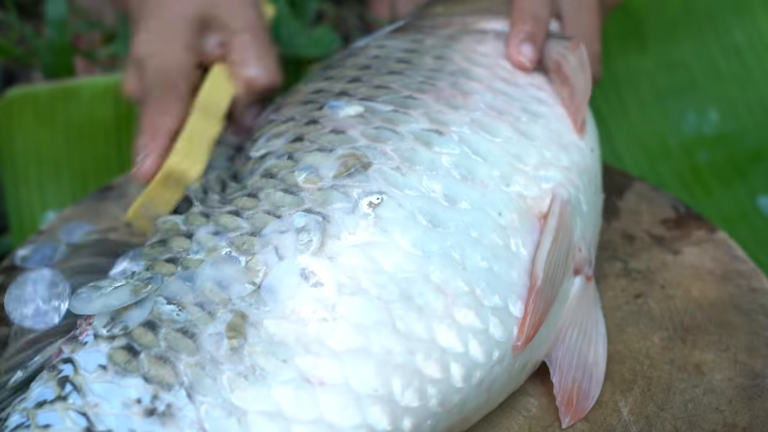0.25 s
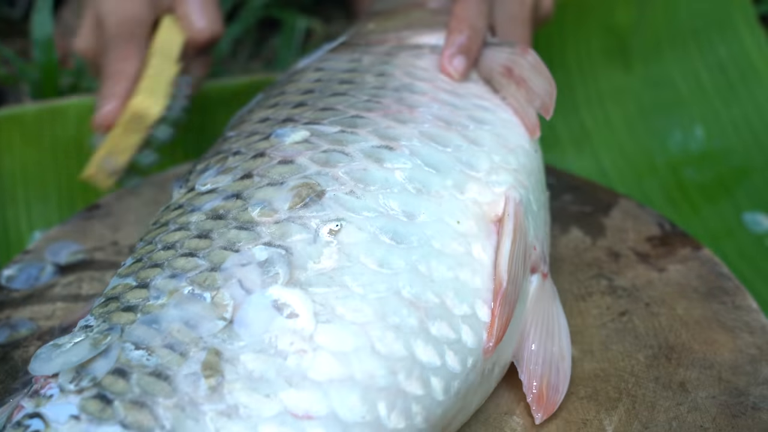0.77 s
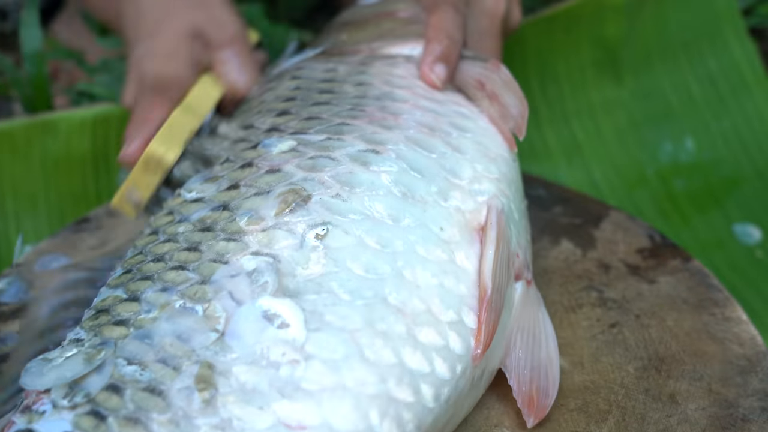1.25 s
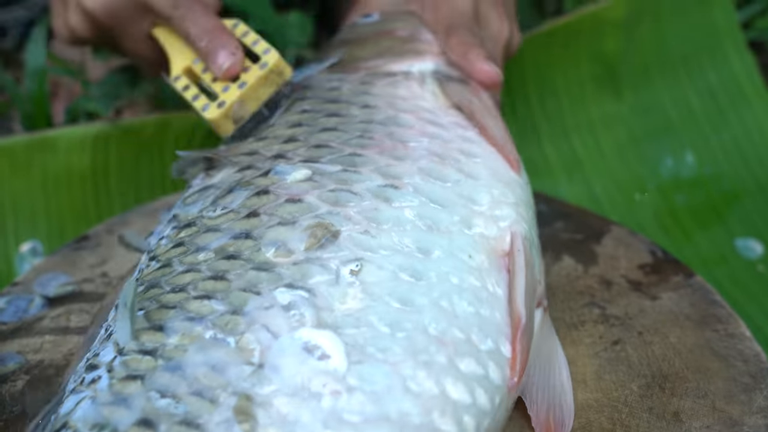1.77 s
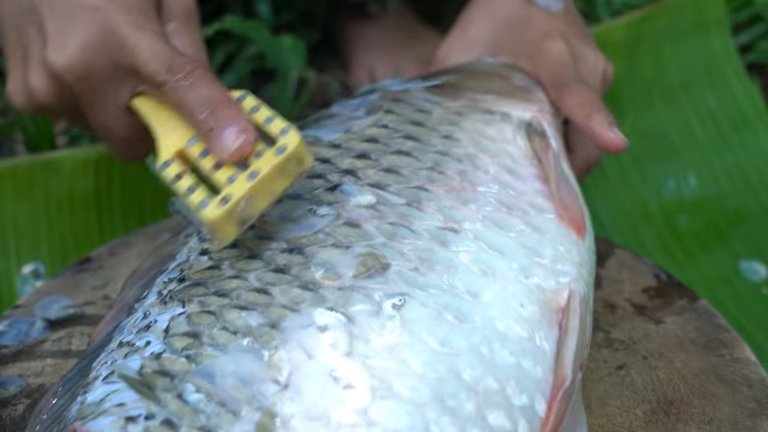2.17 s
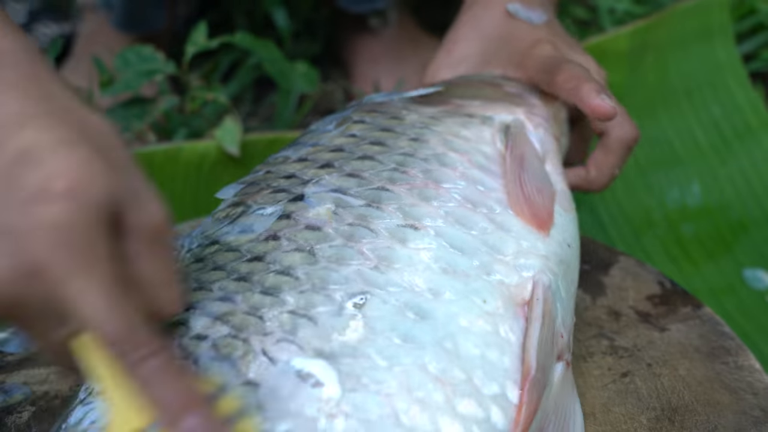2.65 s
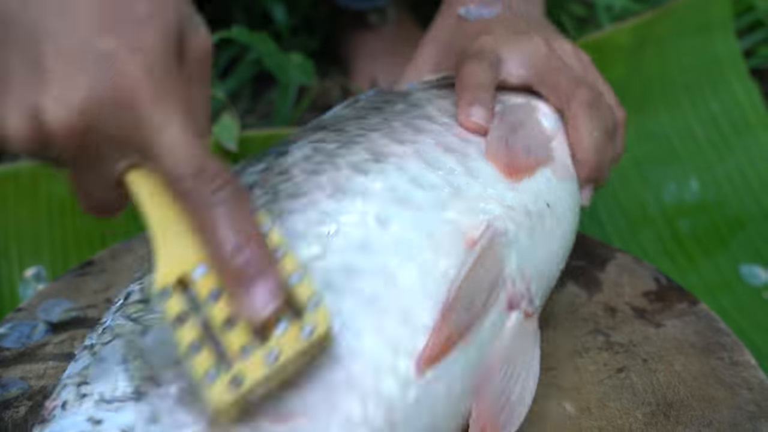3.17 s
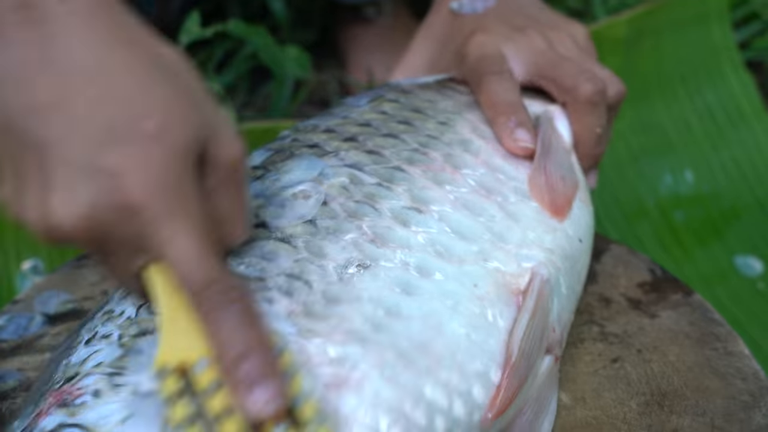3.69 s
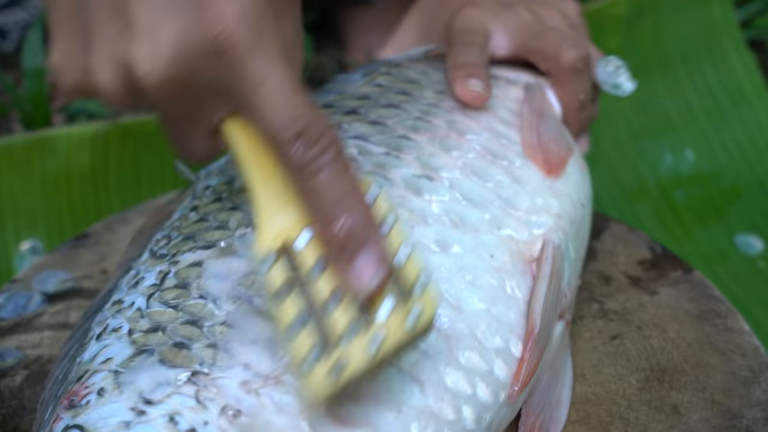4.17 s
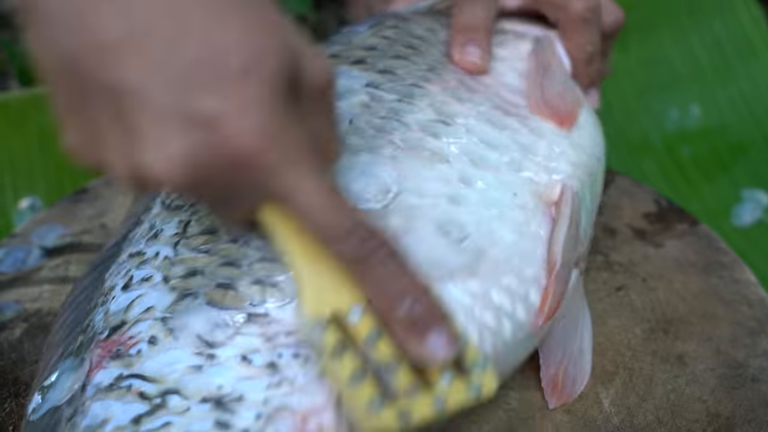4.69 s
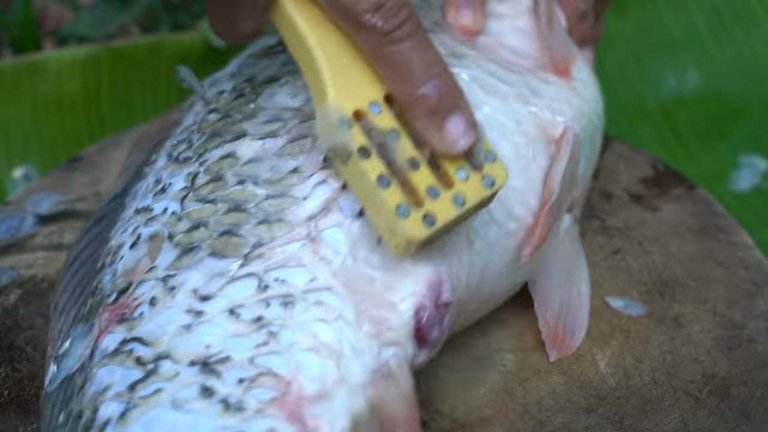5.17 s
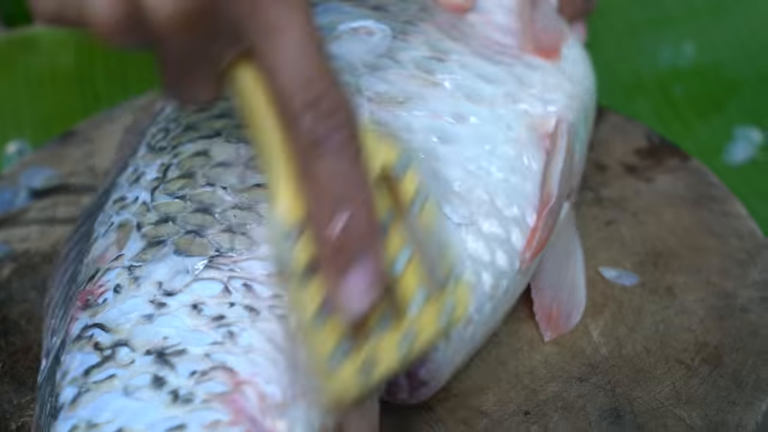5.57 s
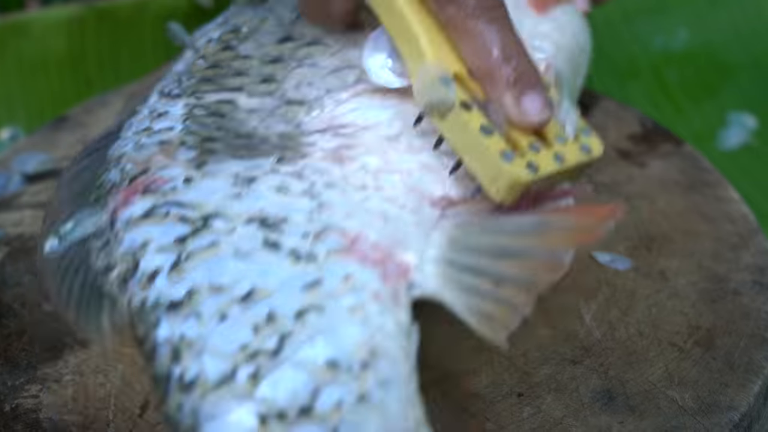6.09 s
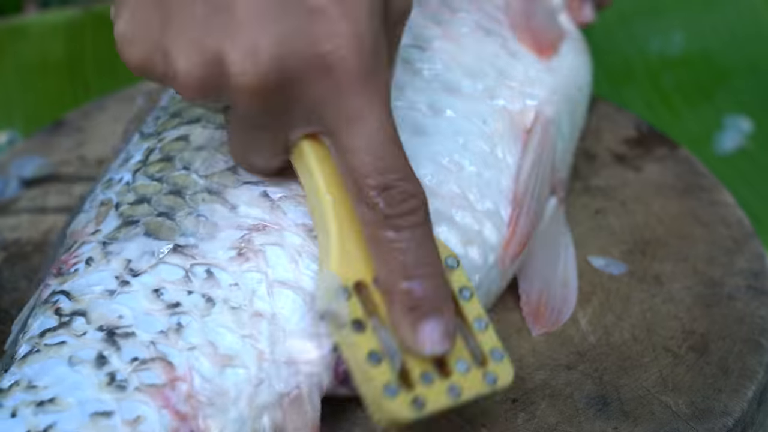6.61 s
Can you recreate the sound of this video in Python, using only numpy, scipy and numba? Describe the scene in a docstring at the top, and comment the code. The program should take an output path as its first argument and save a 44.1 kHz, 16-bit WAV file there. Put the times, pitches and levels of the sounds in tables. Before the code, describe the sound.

A toothed plastic scaler rasps along a large fish on a wooden block, very close to the microphone. From the start it keeps an even rhythm of about three strokes a second, each a short, wet, crackling burst with a slight hollow ring from the tool. Between strokes the teeth brush lightly back, and single scales snap off with sharp clicks throughout. A few dull taps fall between about 1 and 2.6 seconds. From roughly 2 to 5 seconds the flesh gives soft, low thumps under the pushes. The strokes gradually ease and are weakest from about 5.7 to 6.5 seconds. At 6.4 seconds the tool clatters briefly against the block, then a firmer stroke and more snaps follow around 6.8 seconds. Underneath are a faint sticky crackle of wet skin, a soft outdoor hiss and a low wind rumble, with almost no echo.

```python
"""A wet, crackling rasp close to the microphone: a toothed plastic scaler works along a large fish on a
wooden block outdoors, three strokes a second. The teeth flick up scales in dense bursts; the flesh
thuds under them and the tool's hollow head rings. Between strokes the tool brushes lightly back.
Single scales snap off, and a few dull taps sound over quiet open air."""
import sys
import numpy as np
from scipy import signal
from scipy.fft import rfft, irfft
from scipy.io import wavfile
from scipy.ndimage import uniform_filter1d
from numba import njit

SR = 44100
rng = np.random.default_rng(int(sys.argv[2]) if len(sys.argv) > 2 else 0)


def generate_wav(sig):
    """Save sig (samples, or channels by samples) to the path in sys.argv[1] as 16-bit PCM at SR."""
    pcm = np.round(np.clip(np.atleast_2d(sig).T, -1, 1) * 32767).astype(np.int16)
    wavfile.write(sys.argv[1], SR, pcm)


N = 301644
T = np.arange(N) / SR


def undb(db):
    """Decibels to gain."""
    return 10 ** (np.asarray(db) / 20)


def unit(x):
    """Scale to rms 1."""
    return x / np.sqrt(np.mean(x ** 2))


def fade(t, t60):
    """Exponential decay, 60 dB down after t60 seconds."""
    return np.exp(-np.log(1000) * t / t60)


def add(out, start_s, sound):
    """Mix a short sound in at start_s."""
    i = max(int(start_s * SR), 0)
    out[i:i + len(sound)] += sound[:max(N - i, 0)]


def colour(x, points):
    """Causal filter with the given (Hz, dB) response; the result has rms 1."""
    hz, db = np.transpose(points)
    bin_hz = np.arange(N + 1) * SR / (2 * N)
    gain = undb(np.interp(np.log(bin_hz + 1), np.log(hz), db))
    cepstrum = irfft(np.log(gain))
    cepstrum[1:N] *= 2  # fold to minimum phase
    cepstrum[N + 1:] = 0
    return unit(irfft(rfft(x, 2 * N) * np.exp(rfft(cepstrum)))[:N])


@njit
def ring_grains(start, pole, size):
    """Sum of grains, each a damped sine whose pole sets its pitch and decay."""
    out = np.zeros(N)
    for k in range(len(start)):
        z = size[k] + 0j
        for i in range(start[k], min(N, start[k] + int(-6 / np.log(abs(pole[k]))))):
            z *= pole[k]
            out[i] += z.imag
    return out


def flicks(rate, scatter_db, t60):
    """Scales catch and release about rate times a second: the kicks, and the flurry after each."""
    gap, strength = rng.standard_normal((4000, 2)).T
    at = (np.cumsum(np.exp(.5 * gap)) * SR / rate).astype(int)
    kicks = np.zeros(N)
    kicks[at[at < N]] = undb(scatter_db * np.clip(strength[at < N], -2, 1))
    return kicks, unit(signal.lfilter([1], [1, -fade(1 / SR, t60)], kicks))


def crackle(drive, low_hz, high_hz, cycles, scatter_db, count):
    """Tiny rings of scale edges and slime, each with its own pitch and length, as strong as the drive."""
    place, pitch, length, sign = rng.random((count, 4)).T
    start = (place * N).astype(int)
    hz = low_hz * (high_hz / low_hz) ** pitch
    t60 = cycles * 4 ** (length - .5) / hz
    scatter = undb(scatter_db * np.clip(rng.standard_normal(count), -2, 2))
    size = drive[start] * np.sqrt(hz / t60) * np.sign(sign - .5) * scatter
    pole = fade(1 / SR, t60) * np.exp(2j * np.pi * hz / SR)
    return unit(ring_grains(start, pole, size))


def twang(kicks, low_hz, high_hz, t60):
    """Each released scale rings for a moment at a pitch of its own."""
    start = np.flatnonzero(kicks)
    pitch, length = rng.random((4000, 2))[:len(start)].T
    hz = low_hz * (high_hz / low_hz) ** pitch
    pole = fade(1 / SR, t60 * 3 ** (length - .5)) * np.exp(2j * np.pi * hz / SR)
    return unit(ring_grains(start, pole, kicks[start]))


def steady(x):
    """The hand keeps its pressure: single flicks differ, but their power over 25 ms is even."""
    return x / np.sqrt(uniform_filter1d(x ** 2, size=1100) + 1e-9)


def around(start, length):
    """The samples of one contact, with room for landing and lifting."""
    return slice(max(int((start - .05) * SR), 0), int((start + length + .08) * SR))


def contact(age, length, crest, first_db, last_db, arch):
    """Gain of one contact: the tool lands fast, the pressure arches over its crest, the tool lifts."""
    landing_db_per_s, lift_db_per_s = 3992, 1395
    crest = np.clip(crest, .05, .95)
    past = np.clip(age / length, 0, 1) - crest
    rising_db = first_db * abs(past / crest) ** arch
    falling_db = last_db * abs(past / (1 - crest)) ** arch
    away_db = landing_db_per_s * np.maximum(-age, 0) + lift_db_per_s * np.maximum(age - length, 0)
    return undb(np.where(past < 0, rising_db, falling_db) - away_db)


# The air all around, and the low wind. Each row: frequency in Hz, relative level in dB.
AIR_SPECTRUM = [(100, -1), (170, -3.5), (280, -11), (600, -12.5), (1500, -15), (3000, -24), (8000, -16.5),
                (11000, -28.5), (16000, -40)]
WIND_SPECTRUM = [(10, 14), (25, 8.5), (40, -16.5), (60, -18.5), (120, -14.5), (300, -35)]

def open_air():
    """Far behind the work, a soft outdoor hiss lies over an unsteady rumble of wind."""
    gust = unit(signal.resample(rng.standard_normal(40), N))
    hiss = undb(-59) * colour(rng.standard_normal(N), AIR_SPECTRUM)
    rumble = undb(-45.5 + 2 * gust) * colour(rng.standard_normal(N), WIND_SPECTRUM)
    return hiss + rumble


def surroundings(x):
    """Ground and leaves around the block scatter a faint short tail back to the microphone."""
    t = T[:SR // 2]
    dull_noise = signal.lfilter(*signal.butter(1, 4500, fs=SR), rng.standard_normal(len(t)))
    tail = dull_noise * fade(t, 0.52) * (t > .004)
    return undb(-35) * signal.fftconvolve(x, tail / np.linalg.norm(tail))[:N]


# Wet skin on wood. Each row: frequency in Hz, relative level in dB.
WET_SKIN_SPECTRUM = [(150, -6.5), (400, -4.5), (800, -4.5), (1300, -2), (2000, -7.5), (2800, -12),
                     (7000, -14), (12000, -23.5), (16000, -40)]
# The fish shifts under the holding hand. Each row: start in seconds, length in seconds, level in dB.
FISH_SHIFTS = [(0.44, .2, -48.5), (0.87, 0.17, -59), (1.152, 0.13, -41.5), (1.96, 0.052, -49.5),
               (2.169, 0.13, -53.5), (2.816, 0.47, -59), (4.934, 0.24, -53.5), (6.22, 0.11, -65)]

def slither():
    """Down on the wet block the fish creeps: a faint, sticky crackle that swells whenever it shifts."""
    creep_db, settled_db, settle_s = -49, -63, 2.53
    _, flurry = flicks(rate=120, scatter_db=4, t60=.04)
    film = crackle(flurry + 0.65, 151, 14200, cycles=18, scatter_db=1.5, count=40000)
    motion = undb(settled_db + (creep_db - settled_db) * np.exp(-T / settle_s))
    for start, length, db in FISH_SHIFTS:
        add(motion, start, undb(db) * np.hanning(int(length * SR)))
    return colour(film, WET_SKIN_SPECTRUM) * motion


# The fish gives way under a hard push. Each row: start in seconds, relative level in dB.
BODY_THUMPS = [(2.14, -38), (2.478, -35), (2.781, -33), (3.121, -43), (3.481, -46), (3.826, -52),
               (4.097, -36), (4.438, -41), (4.8, -46), (5.134, -40), (6.383, -35)]

def thumps():
    """The soft body answers a push with a few low, quickly damped swings."""
    out, t = np.zeros(N), T[:SR // 6]
    for start, db in BODY_THUMPS:
        body = sum(np.sin(2 * np.pi * hz * rng.normal(1, 0.093) * t) for hz in (75, 120, 175))
        add(out, start, undb(db) * 0.85 * body * fade(t, 0.12) * (1 - fade(t, 0.013)))
    return out


# Struck flesh. Each row: frequency in Hz, relative level in dB.
FLESH_SPECTRUM = [(30, -2), (70, -6.5), (130, -7.5), (300, 1.5), (600, 4), (1000, 7.5), (1600, 2),
                  (4000, -25)]
# Dull taps, and the tool clattering on the block.
# Each row: start in seconds, relative level in dB, pitch in Hz.
DULL_TAPS = [(0.922, -20, 1390), (1.149, -20, 692), (1.213, -23.5, 1510), (1.266, -12.5, 680),
             (1.543, -22.5, 1330), (1.852, -25, 950), (2.598, -17, 1040), (5.045, -24.5, 1110),
             (5.235, -26, 1250), (6.336, -27, 920), (6.354, -30, 2470), (6.397, -1, 1260),
             (6.403, -3.5, 1200), (6.408, -5.5, 1450), (6.413, -20, 663), (6.42, -8, 571)]

def taps():
    """Blunt contacts at the block: a heavily damped knock, a wet splat and a short thud of flesh."""
    out, t = np.zeros(N), T[:SR // 10]
    wet = colour(rng.standard_normal(N), WET_SKIN_SPECTRUM)
    flesh = colour(rng.standard_normal(N), FLESH_SPECTRUM)
    for k, (start, db, hz) in enumerate(DULL_TAPS):
        part = slice(k * len(t), (k + 1) * len(t))
        knock = 0.43 * np.sin(2 * np.pi * hz * t) * fade(t, 0.015)
        splat = 0.26 * wet[part] * fade(t, 0.02)
        thud = 0.064 * flesh[part] * fade(t, 0.052)
        add(out, start, undb(db) * (knock + splat + thud))
    return out


# Brushed scales and fizzing slime, heard close. Each row: frequency in Hz, relative level in dB.
RUSTLE_SPECTRUM = [(100, -19), (500, -17.5), (1000, -0.5), (1600, 2), (3000, 8), (4500, 9), (6800, -7.5),
                   (10000, -33), (16000, -44)]
FIZZ_SPECTRUM = [(4000, -15), (7000, -6), (8200, -0.5), (9100, 0.5), (10200, -10), (11300, -14),
                 (13500, -8), (16000, -25.5)]
# Light returns of the tool. Each row: start in seconds, length in seconds, level in dB,
# hardest point as a share of the length, relative fizz in dB.
RETURN_BRUSHES = [(0.143, 0.032, -33, 0.24, -8.5), (0.788, 0.13, -49.5, 0.22, -1),
                  (1.129, 0.032, -29.5, 0.84, -10), (1.457, 0.037, -30, .65, -13.5),
                  (1.59, 0.028, -27, 0.13, -4), (1.62, 0.031, -30.5, 0.38, -7),
                  (2.592, 0.089, -26.5, 0.73, -3.5), (2.928, 0.078, -30.5, 0.69, -2.5),
                  (3.010, 0.1, -58, 0.36, 2), (3.21, 0.083, -39.5, 0.55, -10.5),
                  (3.28, 0.026, -26, 0.26, -1.5), (3.599, 0.035, -34, .6, -1), (3.64, 0.03, -38, 0.6, -1),
                  (3.886, 0.027, -24.5, 0.37, -7), (3.923, 0.081, -50.5, 0.12, 1),
                  (4.245, .055, -41.5, 0.69, -3.5), (4.596, 0.03, -28.5, 0.29, -2),
                  (4.849, 0.069, -32.5, 0.4, -11), (4.906, 0.07, -34, .75, -22),
                  (5.203, 0.032, -35, 0.61, -11), (5.275, 0.077, -43, 0.5, -7), (5.360, .017, -49, .5, -7),
                  (5.621, 0.069, -38, 0.16, -8), (5.949, 0.042, -43, 0.8, -8),
                  (6.158, 0.062, -41, 0.29, -13), (6.580, 0.035, -35, 0.42, -5),
                  (6.613, .014, -37, 0.59, -1), (6.830, 0.017, -25.5, 0.43, -2)]

def brushes():
    """Sliding back with the lie of the scales, the teeth make a fine wet rustle with sticky ticks."""
    kicks, flurry = flicks(rate=220, scatter_db=-3.5, t60=0.031)
    drive = flurry + 2
    scales = crackle(drive, 155.6, 13950, cycles=16, scatter_db=9, count=40000)
    edges = twang(kicks, 1500, 9000, t60=0.0085)
    rustle = steady(colour(scales + 0.23 * edges + 0.47 * unit(kicks), RUSTLE_SPECTRUM))
    slime = crackle(drive, 4000, 15700, cycles=27, scatter_db=4.5, count=24000)
    fizz = undb(3) * steady(colour(slime, FIZZ_SPECTRUM))
    out = np.zeros(N)
    for start, length, db, crest, fizz_db in RETURN_BRUSHES:
        part = around(start, length)
        touch = contact(T[part] - start, length, crest, first_db=-19, last_db=-19, arch=1.47)
        out[part] += undb(db) * touch * (rustle[part] + undb(fizz_db) * fizz[part])
    return out


# The crack of a tearing scale. Each row: frequency in Hz, relative level in dB.
CRACK_SPECTRUM = [(100, -53), (500, -29.5), (1400, -0.5), (3200, -2.5), (5000, 0), (8000, -12.5),
                  (16000, -24)]
# Single scales snap off near the microphone.
# Each row: start in seconds, relative level in dB, pitch in Hz, relative treble spray in dB.
SCALE_SNAPS = [(0.0113, 1.5, 3670, -4.5), (0.0755, 3, 6840, -14.5), (0.0891, 2, 3730, 0),
               (0.314, 5, 9120, -10), (0.3446, 6.5, 7640, -12), (0.3713, 1, 4450, -3),
               (0.384, 5.5, 3320, -21), (0.3888, 6, 2680, -15), (0.3986, 9, 2480, -16),
               (0.4166, 6, 3650, -11.5), (0.4446, 8.5, 3900, -11), (0.6384, 0.5, 2480, -1),
               (0.73, 7.5, 8550, -24.5), (0.7445, 10, 3870, -16.5), (0.987, 2, 3600, -10),
               (1.0306, 6.5, 3380, -22), (1.052, 7, 5120, -7), (1.1473, -7.5, 4340, -18),
               (1.352, 7, 4980, -12), (1.3991, 7.5, 8300, -24), (1.4208, -0.5, 2850, -6),
               (1.5893, -5, 3380, -40.5), (1.7227, 4.5, 3330, -7.5), (1.878, -8.5, 3200, -8),
               (1.8862, -10, 9600, -1), (2.0717, -2, 2500, -21.5), (2.161, 1, 4370, -5),
               (2.3341, -28, 7100, -8), (2.4614, 4, 1980, -14), (2.5217, 9, 3100, -23),
               (2.5334, 2, 3940, -9), (2.7658, 5, 3320, -14), (2.7895, 0.5, 1530, -23),
               (2.821, 0, 3770, -14), (2.8797, -9, 3240, -13), (2.9066, -17, 3580, -20.5),
               (3.1127, 2.5, 10030, -4), (3.141, -1.5, 2660, -25.5), (3.1587, -5.5, 3400, 2.5),
               (3.2821, -0.5, 8840, -24), (3.4694, 1, 1560, -21), (3.483, 6, 3760, -32),
               (3.7785, -1, 1760, -24), (3.8963, 0, 8580, -23), (4.0902, -1.5, 1890, -8),
               (4.142, 2.5, 3300, -8), (4.17, 2, 6500, -10), (4.1774, 1.5, 2960, -19),
               (4.1972, -7.5, 3030, -26), (4.222, -16, 3140, -19), (4.4105, 1.5, 1850, -13),
               (4.537, -2.5, 3320, -20), (4.604, -4.5, 7800, -35), (4.6464, -11, 6800, -11),
               (4.7707, 0.5, 1860, -5.5), (4.8318, 5.5, 3600, -15), (4.8839, -3.5, 3230, -14),
               (4.9611, -11, 3630, -11.5), (5.1306, 4.5, 1740, -24), (5.1781, 3, 2900, -28),
               (5.2748, -23.5, 2900, -2), (5.4904, 3.5, 3100, -15), (5.5902, -16.5, 2840, -32),
               (5.7448, -12.5, 3950, -6), (5.767, -2.5, 3030, -7), (5.9855, -21, 2700, -16),
               (6.1246, -2, 1590, -30), (6.2254, -17.5, 3770, -10), (6.4485, -12, 3160, 5),
               (6.4877, -1, 3230, -22), (6.7188, -14.5, 2940, -5), (6.8039, 2.5, 2800, -16),
               (6.8152, -1, 8450, -21)]

def snaps():
    """A scale tears loose: it strains, then cracks, rings a few cycles and leaves a short wet tail."""
    out, t = np.zeros(N), T[:SR // 25]
    tearing = undb(-14) * colour(rng.standard_normal(N), CRACK_SPECTRUM)
    spray = undb(-7.5) * colour(rng.standard_normal(N), FIZZ_SPECTRUM)
    strain_s = 0.001272
    free, since = t >= strain_s, np.maximum(t - strain_s, 0)
    burst = np.where(free, fade(since, 0.0051) + 0.14 * fade(since, 0.063), .2)
    for k, (start, db, hz, spray_db) in enumerate(SCALE_SNAPS):
        part = slice(k * len(t), (k + 1) * len(t))
        ring = undb(-9.5) * free * np.cos(2 * np.pi * hz * since) * fade(since, 0.0084)
        crack = burst * (tearing[part] + undb(spray_db) * spray[part])
        add(out, start, undb(db) * (ring + crack))
    return out


def hollow_head(x, hz, width_hz=630):
    """The tool's hollow head rings at one pitch: two passes through the same resonance, rms 1."""
    b, a = signal.iirpeak(hz, hz / width_hz, fs=SR)
    return unit(signal.lfilter(b, a, signal.lfilter(b, a, x)))


# Teeth rasping through scales. Each row: frequency in Hz, relative level in dB.
RASP_SPECTRUM = [(300, -31.5), (900, -8), (1500, -7.5), (2100, -1.5), (3200, 2.5), (4800, -0.5), (6800, -8),
                 (9000, -22), (16000, -43.5)]
# Pressed strokes, close in front of the microphone. Each row: start in seconds, length in seconds,
# level in dB, hardest point as a share of the length, bite in dB, ease in dB, flesh in dB,
# hollow ring in dB, its pitch in Hz, fizz in dB. Bite and ease are the pressure at the two ends,
# relative to the hardest point; flesh, ring and fizz are relative to the rasp.
PRESSED_STROKES = [(0.003, 0.12, -17.5, 0.63, -7.5, -24.5, -8.5, -19, 1600, -1),
                   (0.31, 0.12, -15.5, 0.47, -12, -11.5, -10, -18, 1860, -3.7),
                   (0.619, 0.14, -18, 0.31, -23, -6.5, -13, -8, 1700, -2.5),
                   (0.959, .14, -18.3, 0.62, -14, -8.5, -10, -5.5, 1800, -4),
                   (1.304, 0.11, -17.5, 0.44, -18, -4.5, -10.5, -21, 1660, -4),
                   (1.668, 0.14, -17.5, 0.39, -15, -7.5, -15.5, -12.5, 1610, -3),
                   (2.055, 0.14, -18.5, 0.23, -10.5, -11.5, -16.5, -15, 1680, -6),
                   (2.408, 0.15, -19.5, 0.4, -15.5, -7, -14.5, -10.5, 1970, -2.5),
                   (2.747, 0.11, -20, 0.32, -15, -19.5, -18.5, -29, 1500, -6),
                   (3.095, 0.087, -22, 0.67, -12, -6.5, -16, -12, 1650, -9),
                   (3.419, .14, -20, 0.58, -16, -19, -10, -4, 1590, -3),
                   (3.755, 0.12, -19, 0.74, -17.5, -16.5, -15.5, -8, 1780, -4),
                   (4.066, 0.13, -20, 0.54, -14.5, -18, -17, -4, 1680, -4.5),
                   (4.379, 0.14, -21.5, 0.65, -10, -5, -16, -7, 1770, -7.5),
                   (4.729, 0.11, -21.5, 0.95, -18, -9, -13, -8, 1680, -7.5),
                   (5.074, 0.13, -22.5, 0.35, -20.5, -14, -16, -2.5, 1700, -8),
                   (5.412, 0.16, -24.5, 0.25, -17.5, -11.5, -20, -4.5, 1630, -5.5),
                   (5.757, 0.11, -27, 0.55, -9, -7, -16, -2.5, 1670, -6.5),
                   (6.076, 0.094, -31, 0.44, -5, -19, -8, 0, 1730, -0.5),
                   (6.451, 0.095, -29, 0.92, -4.5, -25, -14.5, -22, 1650, 0.5),
                   (6.723, 0.081, -21.5, 0.62, -20.5, 0, -22, -10.5, 1600, -5.5)]

def strokes():
    """Every flick of the teeth crackles, thumps the flesh, rings the tool and squeezes out slime."""
    # The ring peaks once the teeth have sunk in; after that it and the thuds die away.
    sink_in_s, swell_db_per_s = 0.033, 167.5
    ring_damp_db_per_s, flesh_damp_db_per_s = 173, 23.5
    kicks, flurry = flicks(rate=215, scatter_db=6, t60=0.015)
    clicks, drive = unit(kicks), flurry + .5
    scales = crackle(drive, 498, 15070, cycles=15.6, scatter_db=0.5, count=40000) + 0.48 * clicks
    edges = twang(kicks, 1354, 9500, t60=0.03)
    rasp = steady(colour(scales + 0.33 * edges, RASP_SPECTRUM))
    slime = crackle(drive, 4360, 15650, cycles=18, scatter_db=4, count=30000)
    fizz = steady(colour(slime + 0.51 * clicks, FIZZ_SPECTRUM))
    thuds = steady(colour(clicks + drive * rng.standard_normal(N), FLESH_SPECTRUM))
    out = np.zeros(N)
    for (start, length, db, crest, bite_db, ease_db,
         flesh_db, ring_db, ring_hz, fizz_db) in PRESSED_STROKES:
        part = around(start, length)
        age = T[part] - start
        sinking, sunk = np.maximum(sink_in_s - age, 0), np.maximum(age - sink_in_s, 0)
        ring_gain = undb(ring_db - swell_db_per_s * sinking - ring_damp_db_per_s * sunk)
        ring = ring_gain * steady(hollow_head(scales[part], ring_hz))
        flesh = undb(flesh_db - flesh_damp_db_per_s * sunk) * thuds[part]
        pressure = contact(age, length, crest, bite_db, ease_db, arch=1.82)
        out[part] += undb(db) * pressure * (rasp[part] + flesh + ring + undb(fizz_db) * fizz[part])
    return out


def scene():
    """One microphone close to the block: the work on the fish, its faint echo and the open air."""
    work = strokes() + brushes() + snaps() + taps() + thumps() + slither()
    return (work + surroundings(work) + open_air())[None]


def record(dry):
    """At this close range the sharpest cracks clip at full scale; the top is cut above 16.3 kHz."""
    lowpass = signal.ellip(10, .2, 70, 16300, fs=SR, output="sos")
    return signal.sosfilt(lowpass, np.clip(dry, -1, 1))


dry = scene()
out = record(dry)
generate_wav(out)
```